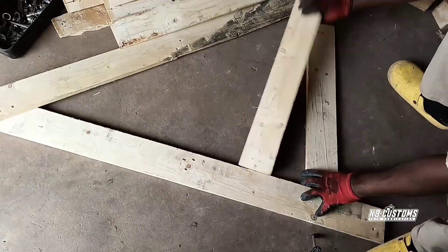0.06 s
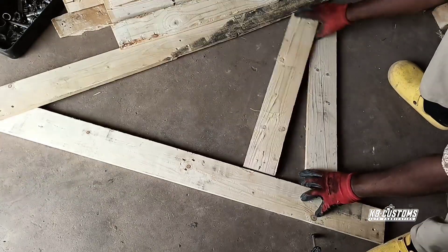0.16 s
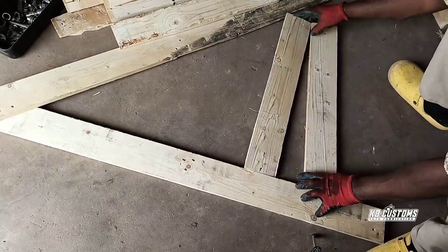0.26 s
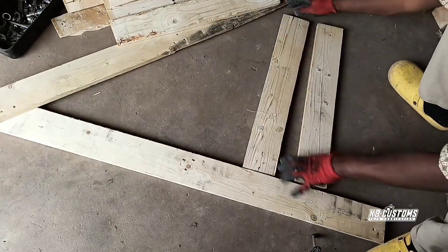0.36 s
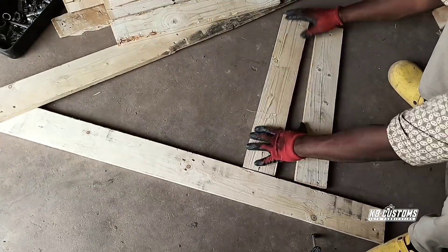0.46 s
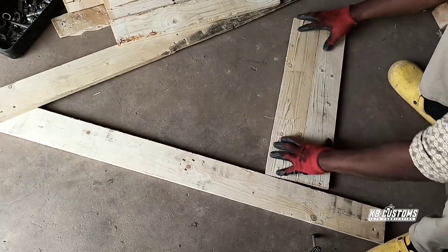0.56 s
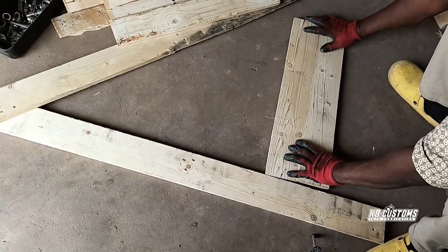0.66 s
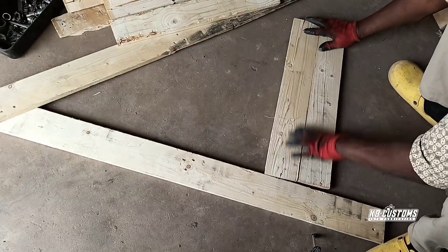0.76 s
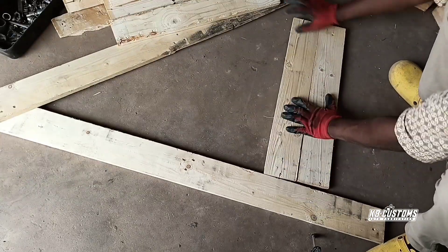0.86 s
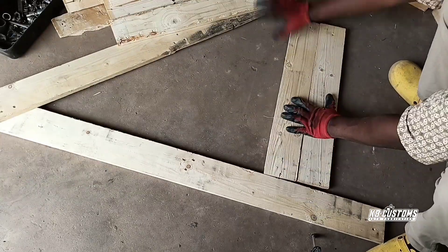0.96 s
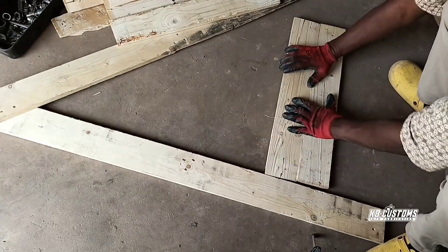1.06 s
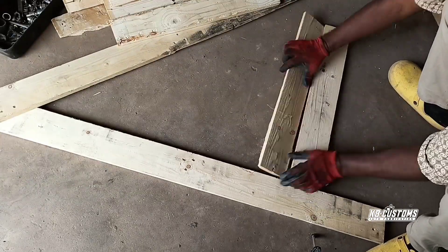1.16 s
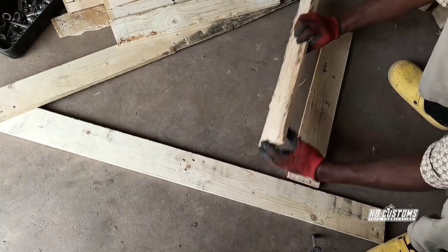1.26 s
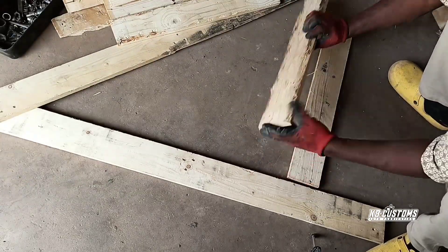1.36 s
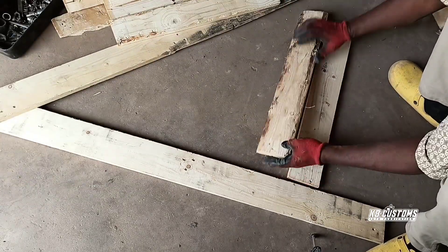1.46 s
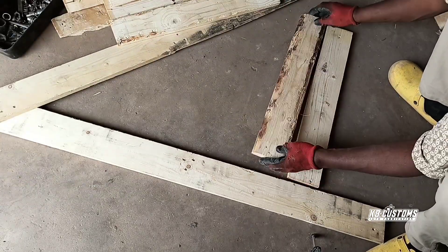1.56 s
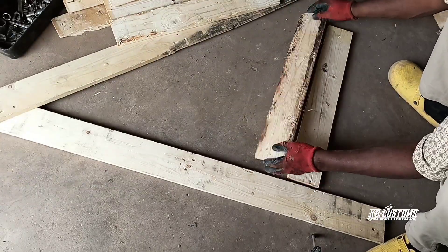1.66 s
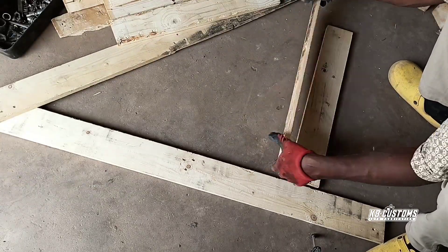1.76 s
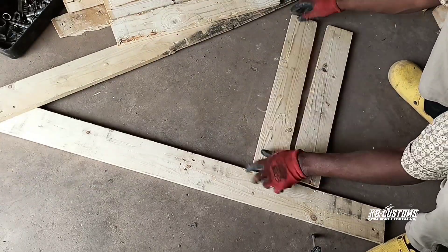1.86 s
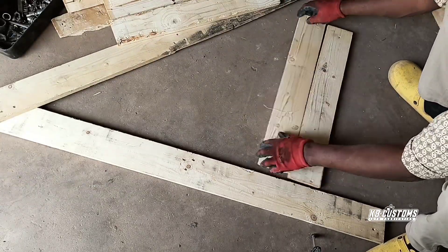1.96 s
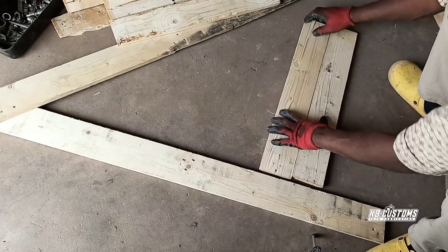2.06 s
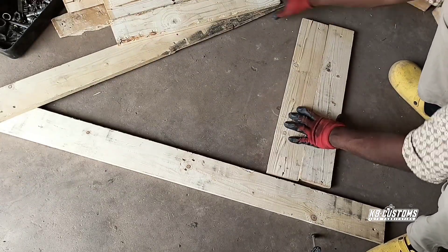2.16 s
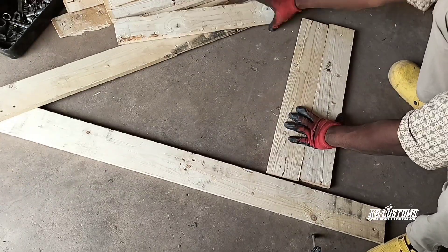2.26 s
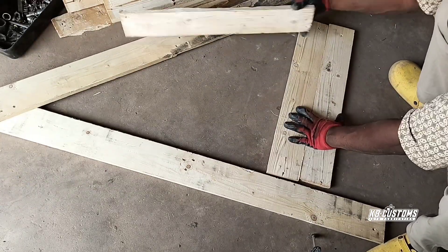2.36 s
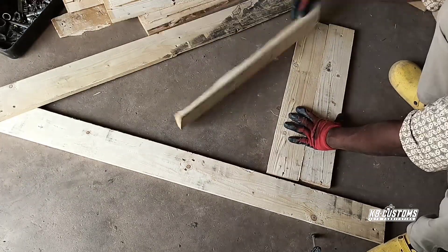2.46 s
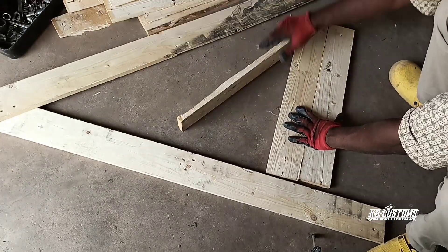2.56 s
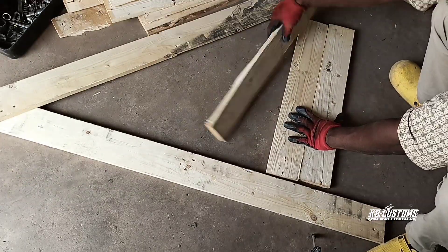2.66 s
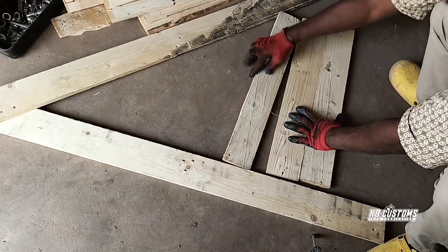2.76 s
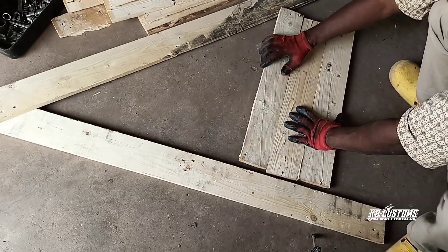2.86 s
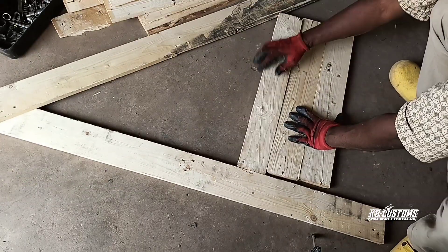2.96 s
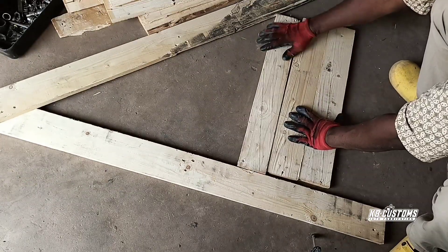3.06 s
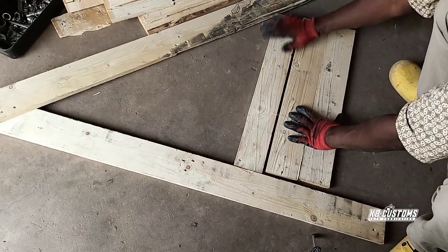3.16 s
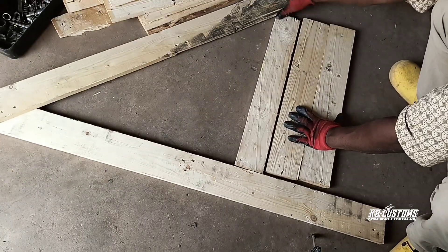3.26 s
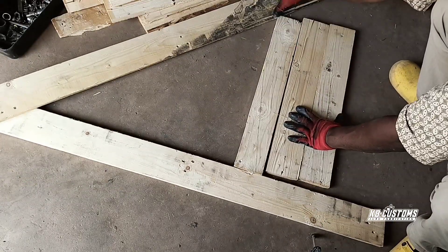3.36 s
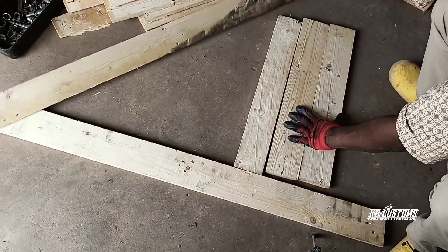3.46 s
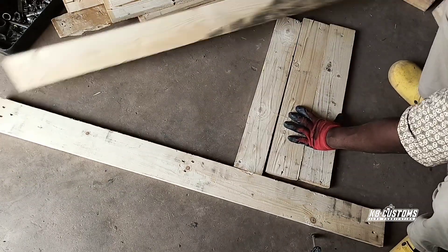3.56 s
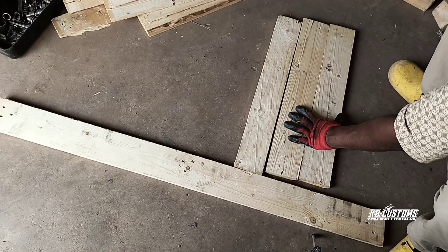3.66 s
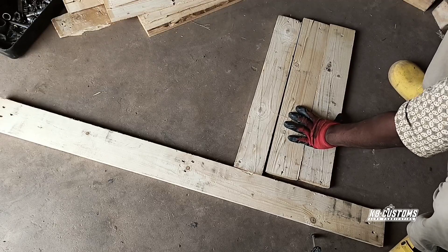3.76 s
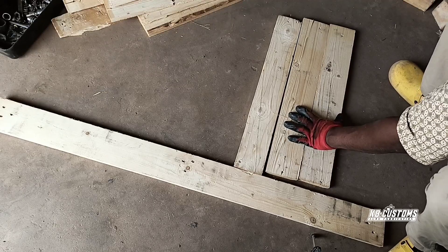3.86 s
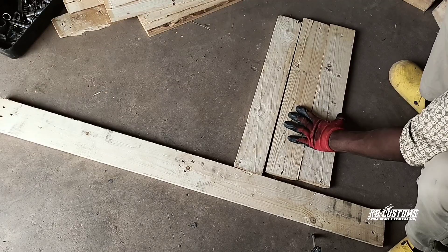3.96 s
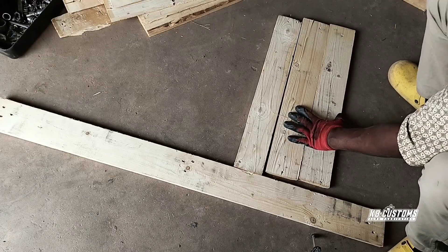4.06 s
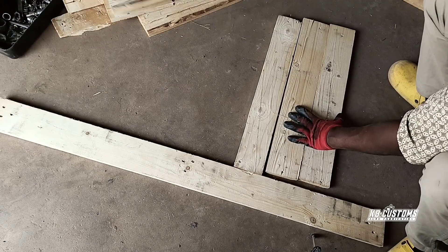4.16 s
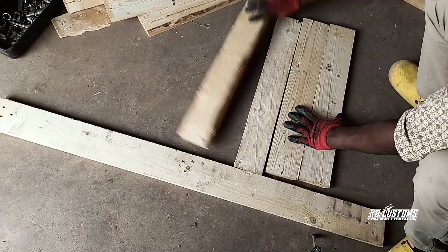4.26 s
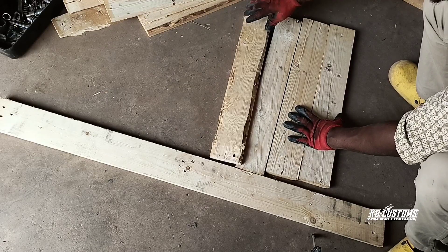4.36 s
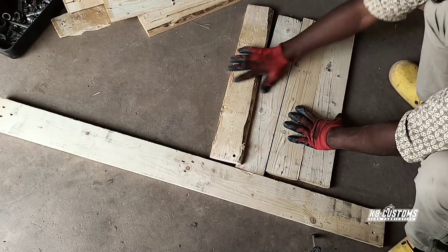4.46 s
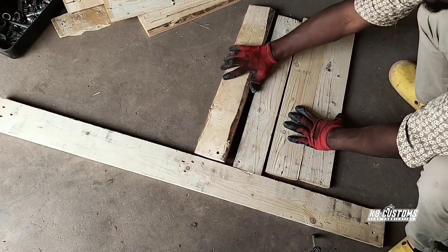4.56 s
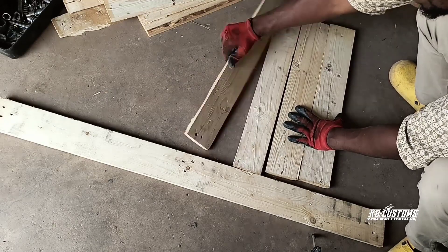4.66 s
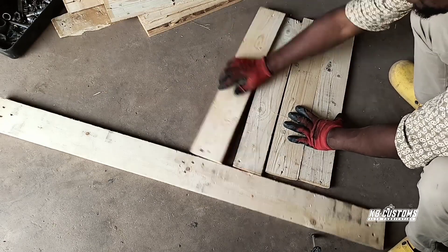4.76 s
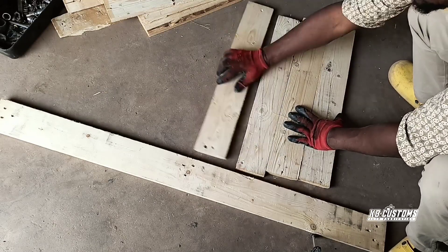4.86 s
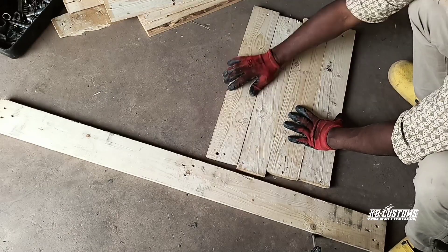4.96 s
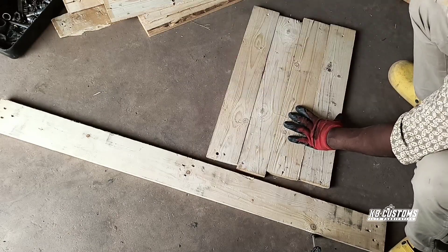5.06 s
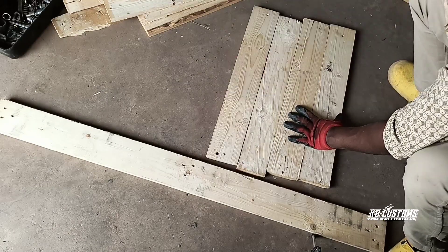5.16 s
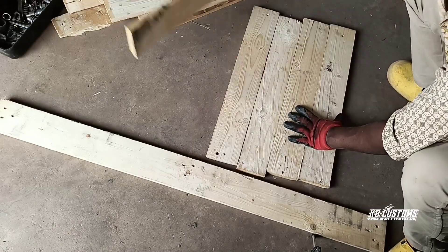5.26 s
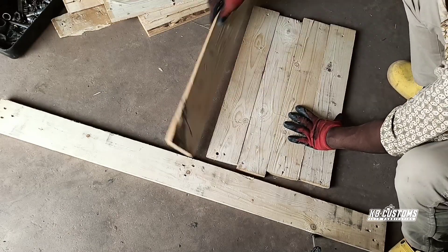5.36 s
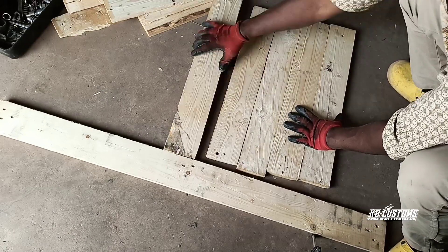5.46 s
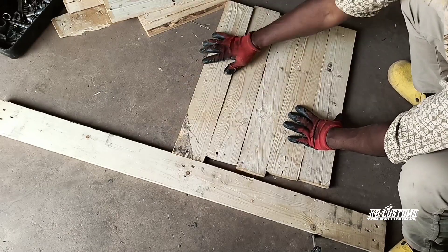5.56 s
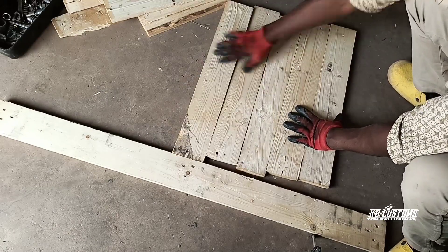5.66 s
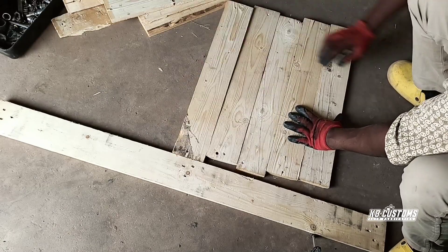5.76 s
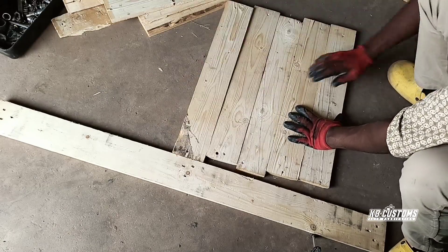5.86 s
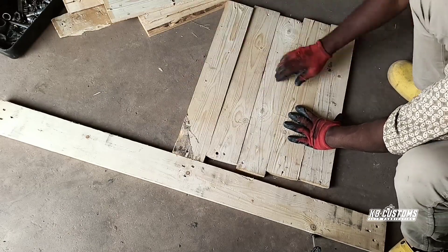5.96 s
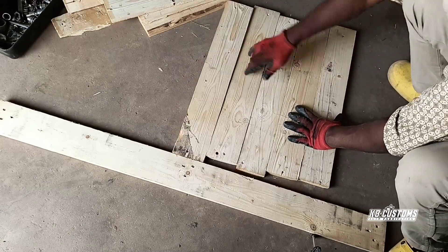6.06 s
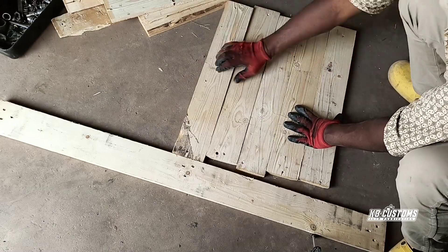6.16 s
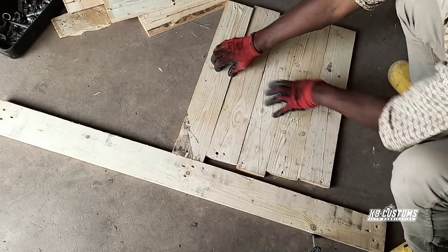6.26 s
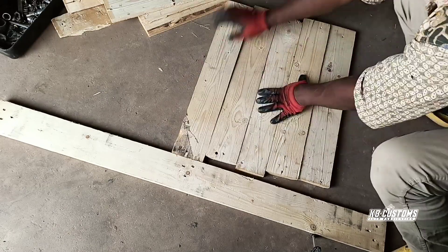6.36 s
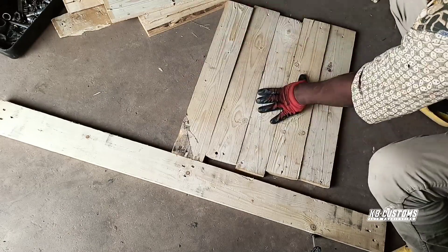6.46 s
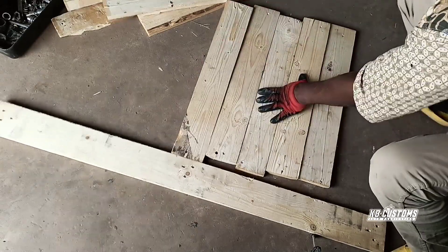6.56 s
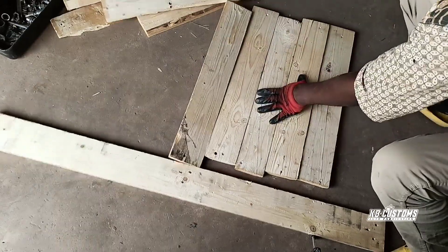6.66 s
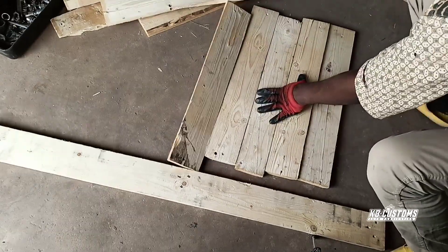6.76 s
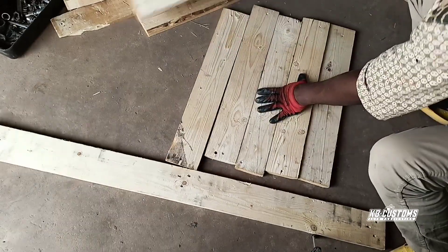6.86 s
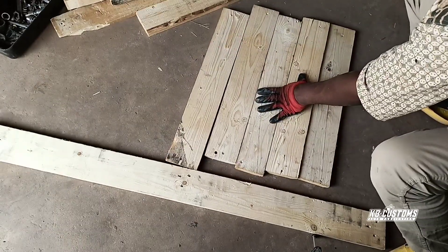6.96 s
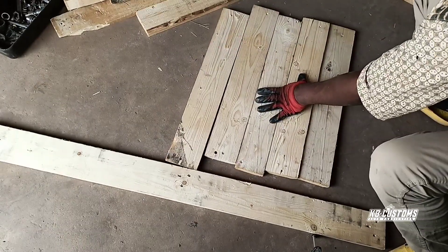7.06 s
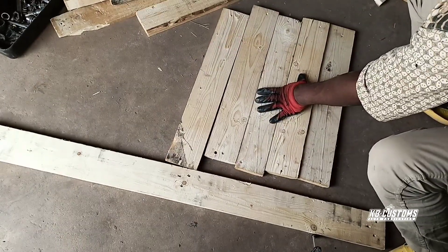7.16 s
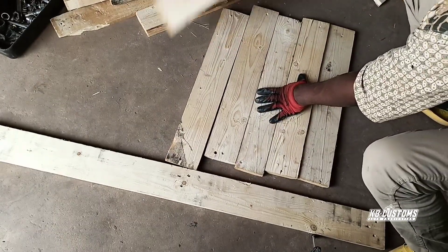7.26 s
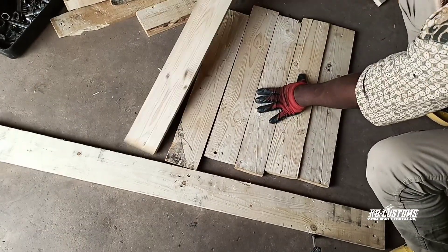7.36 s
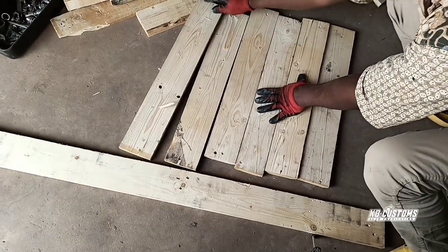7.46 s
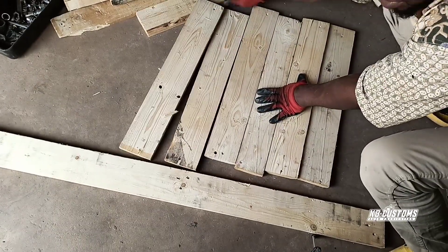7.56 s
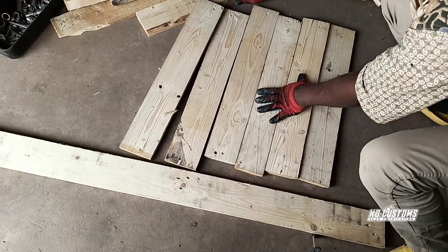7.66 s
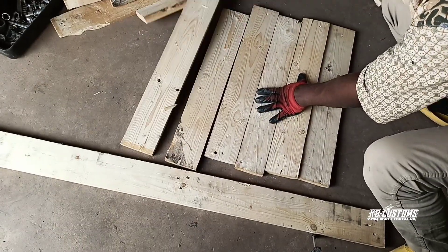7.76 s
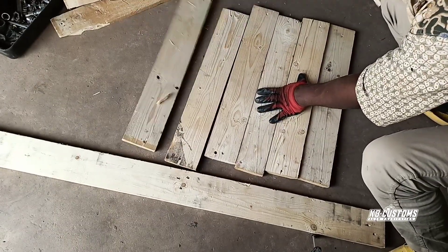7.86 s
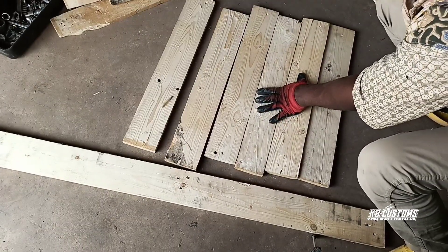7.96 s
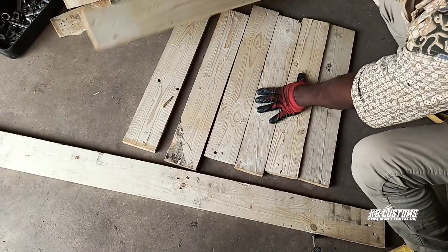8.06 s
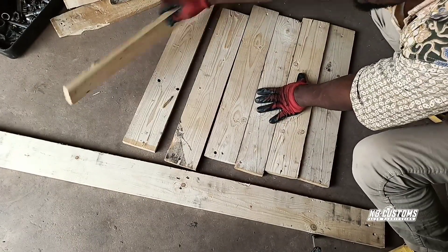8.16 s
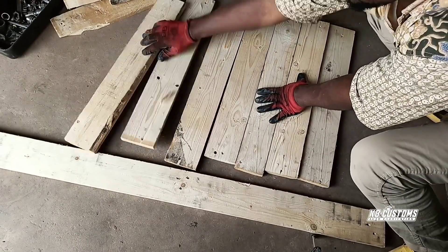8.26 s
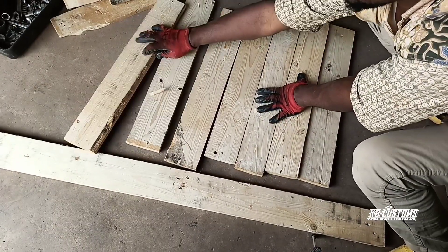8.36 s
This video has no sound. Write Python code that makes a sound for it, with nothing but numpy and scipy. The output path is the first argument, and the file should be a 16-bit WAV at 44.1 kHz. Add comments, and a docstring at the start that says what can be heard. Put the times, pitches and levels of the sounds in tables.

```python
"""Loose pallet boards are laid side by side on a concrete workshop floor, close to the ear.
They knock and clatter as they land: impulsive forces excite bending modes, a crack and a thud.
Pushed by gloved hands they scrape over grit, as random stick and slip; edges tap and gloves brush.
Now and then a dragged board judders, as a wavering sine on one mode. Dull bumps are filtered noise.
Faint reflections follow each contact, and very quiet room air lies beneath."""
import sys
import numpy as np
from scipy import signal
from scipy.fft import rfft, irfft
from scipy.io import wavfile

SR = 44100
rng = np.random.default_rng(int(sys.argv[2]) if len(sys.argv) > 2 else 0)


def file_out(sig):
    """Save sig as 16-bit WAV at sys.argv[1]."""
    # one column per channel
    cols = np.atleast_2d(sig).T
    # limit, then scale
    lim = np.clip(cols, -1, 1)
    pcm = np.round(lim * 32767).astype(np.int16)
    wavfile.write(sys.argv[1], SR, pcm)


N = 371322


def undb(db):
    """Logarithmic level: convert decibels to amplitude gain."""
    return 10 ** (np.asarray(db) / 20)


def unit(x):
    """Normalisation: scale to rms 1."""
    return x / np.sqrt(np.mean(x ** 2))


def colour(x, points, size=1024):
    """Minimum phase: the folded cepstrum of the log gain through (f/Hz, level/dB) gives a causal filter."""
    hz, db = np.transpose(points)
    grid = np.maximum(np.arange(size // 2 + 1) * SR / size, 1)
    log_gain = np.log(undb(np.interp(np.log(grid), np.log(hz), db)))
    cepstrum = irfft(log_gain)
    cepstrum[1:size // 2] *= 2
    cepstrum[size // 2 + 1:] = 0
    response = irfft(np.exp(rfft(cepstrum)))
    return signal.fftconvolve(x, response)[:len(x)]


def resonate(x, hz, width):
    """Simple resonance: a two-pole band-pass with gain 1 at the centre."""
    b, a = signal.iirpeak(hz, hz / min(width, SR / 4), SR)
    return signal.lfilter(b, a, x)


def add(out, s, x):
    """Superposition: mix x into out, starting at time s."""
    i = int(s * SR)
    a, b = max(i, 0), min(i + len(x), N)
    if b > a:
        out[a:b] += x[a - i:b - i]


def at_level(x, envelope, db):
    """Energy equivalence: give x the energy of this envelope with its top at db."""
    return x * undb(db) * np.sqrt(np.sum(envelope ** 2) / np.sum(x ** 2))


# spectrum of the room air: f/Hz, level/dB (relative)
AIR = [(25, -15), (60, -5), (130, 2), (400, -3.5), (900, -10.5), (2500, -14.5), (9000, -15), (12000, -27.5)]
# gain on the air's treble: t/s, level/dB
HISS_LEVEL = [(0, 12.5), (1.5, 2), (2.2, -2), (8.401, -5)]
AIR_DB, HISS_HZ = -77.5, 2500  # rms level before the treble gain; crossover


def air():
    """Broadband noise: very quiet room air, whose hiss sinks away as the work goes on."""
    noise = undb(AIR_DB) * unit(colour(rng.standard_normal(N), AIR))
    low = signal.sosfilt(signal.butter(2, HISS_HZ, "low", fs=SR, output="sos"), noise)
    high = signal.sosfilt(signal.butter(2, HISS_HZ, "high", fs=SR, output="sos"), noise)
    hiss_db = np.interp(np.arange(N) / SR, *np.transpose(HISS_LEVEL))
    # opposite signs keep the two bands in phase at the crossover
    return low - high * undb(hiss_db)


# a dragged board judders on one mode: t/s (peak), f/Hz, level/dB
JUDDERS = [(.005, 706, -34), (1.034, 791, -33.5), (1.687, 307, -36), (1.747, 1433, -25), (2.567, 2017, -36),
           (2.64, 854, -20.5), (2.639, 382, -29.5), (3.729, 178, -31.5), (6.711, 1598, -26.5),
           (6.939, 863, -19.5), (7.0, 332.3, -34), (7.32, 1628, -19), (7.724, 1546, -18),
           (7.797, 1536, -20.5)]
JUDDER_HALF_S = 0.015  # from the peak to 1/e


def judders(waver=0.021, rough=0.05):
    """Stick-slip oscillation: friction locks onto one mode, slightly unsteady in pitch and strength."""
    out, t = np.zeros(N), np.arange(-SR // 10, SR // 10) / SR
    swell = np.exp(-(abs(t) / JUDDER_HALF_S) ** 2.2)
    for s, hz, db in JUDDERS:
        drift = unit(resonate(rng.standard_normal(len(t)), 44, 110))
        grip = unit(resonate(rng.standard_normal(len(t)), 44, 110))
        phase = 2 * np.pi * np.cumsum(hz * (1 + waver * drift)) / SR
        tone = np.sqrt(2) * np.sin(phase)
        add(out, s + t[0], undb(db) * swell * (1 + rough * grip) * tone)
    return out


def slips(n, rate, spread_db):
    """Random impulses: tiny slips, rate per second; a positive spread makes a few much stronger."""
    sizes = undb(spread_db * np.minimum(rng.exponential(size=n), 4))
    happens = rng.random(n) < rate / SR
    return unit(rng.standard_normal(n) * sizes * happens)


def grain(x, ring_s, direct):
    """Modal overlap: a contact excites a thicket of short modes, heard as decaying noise."""
    t = np.arange(SR // 50) / SR
    response = unit(rng.standard_normal(len(t)) * np.exp(-t / ring_s)) / np.sqrt(len(t))
    response[0] += direct
    return signal.fftconvolve(x, response)[:len(x)]


def catches(n, rate_hz, depth_db):
    """Friction modulation: gain of a surface that catches and lets go at an uneven pace."""
    return undb(depth_db * unit(resonate(rng.standard_normal(n), rate_hz, rate_hz)))


# nominal bending and twisting modes of a board: f/Hz, width/Hz, level/dB (relative)
BOARD = [(725, 21, -6), (792.4, 12, 6), (875, 82, -1), (1052, 50, -4), (1240, 79, -6), (1390, 110, -7),
         (1539.6, 38, -2), (1693, 160, -11.5), (2126, 24, -6.5), (2479, 15, -6), (3430, 310, -14),
         (3840, 59, -6)]
# spectrum of the wood: f/Hz, level/dB (relative)
WOOD = [(150, -34.5), (330, -12.5), (520, 7), (750, -1.5), (1600, -4), (2600, 2), (3600, -2.5),
        (6000, -21.5), (12000, -46)]


def board(force, centre_hz, mode_db=11, breadth=0.55):
    """Modal superposition: board and grip shift the modes, and the contact sets the brightness."""
    shifts = np.exp(.02 * rng.standard_normal(len(BOARD)))
    weights_db = 2.5 * rng.standard_normal(len(BOARD))
    modes = np.zeros(len(force))
    for (hz, width, db), shift, weight_db in zip(BOARD, shifts, weights_db):
        modes += undb(db + weight_db) * resonate(force, hz * shift, width)
    wood = colour(force + undb(mode_db) * modes, WOOD)
    return resonate(wood, centre_hz, breadth * centre_hz)


# the duller the contact, the more weight is on the floor
MIDDLE_HZ, THUD_DB_PER_OCTAVE = 1230, -13.5


def thud_of(tone_hz):
    """Contact stiffness: extra thud in dB of a dull, heavy contact over a middling one."""
    return THUD_DB_PER_OCTAVE * np.log2(tone_hz / MIDDLE_HZ)


# spectrum of crunching grit: f/Hz, level/dB (relative)
GRIT = [(900, -27), (2500, -1), (3800, 5), (6500, 5), (7800, -2.5), (9200, -1.5), (11000, -12.5),
        (13500, -21.5), (14700, -9.5), (16000, -14.5)]
# spectrum of weight thudding on the floor: f/Hz, level/dB (relative)
THUD = [(25, -32), (60, -21), (110, -8), (170, -3), (240, -5.5), (320, 7), (430, 4.5), (800, -11.5),
        (3000, -67)]
SCRAPE_THUD_DB = -14  # relative to the wood at MIDDLE_HZ
GRIT_KNEE_HZ = 6000  # above it the grit tilts by top_db per octave
CATCH_STEEPNESS, RELEASE_STEEPNESS = 2.3, 2  # exponents of the swell and the fade


def stroke(s, rise, fall, wood_db, grit_db, centre_hz, top_db):
    """Sliding friction: wood sticks and slips, grit crunches under it, its weight thuds on the floor."""
    t = np.arange(-SR // 8, SR // 5) / SR
    span = np.maximum(np.where(t < 0, rise, fall), .003)
    steepness = np.where(t < 0, CATCH_STEEPNESS, RELEASE_STEEPNESS)
    speed = np.exp(-(abs(t) / span) ** steepness)
    pressure = speed * catches(len(t), rate_hz=25, depth_db=2.18)
    rumble = grain(rng.standard_normal(len(t)), ring_s=0.0065, direct=0.37)
    thud = speed * colour(rumble, THUD)
    friction = grain(slips(len(t), rate=1300, spread_db=2.5), ring_s=0.0048, direct=0.73)
    wood = pressure * board(friction, centre_hz)
    crushing = catches(len(t), rate_hz=59, depth_db=1.0) * slips(len(t), rate=12000, spread_db=0.0)
    crunch = grain(crushing, ring_s=0.0081, direct=0.45)
    # a few coarse grains crack one by one
    ticks = undb(-5.5) * slips(len(t), rate=400, spread_db=3.5)
    spectrum = [(hz, db + top_db * max(np.log2(hz / GRIT_KNEE_HZ), 0)) for hz, db in GRIT]
    grit = colour(pressure * (unit(crunch) + ticks), spectrum)
    thud_db = wood_db + SCRAPE_THUD_DB + thud_of(centre_hz)
    mix = at_level(thud, speed, thud_db)
    mix += at_level(wood, speed, wood_db)
    mix += at_level(grit, speed, grit_db)
    return s + t[0], mix


# a board is pushed over the floor:
# t/s (top speed), length/s, wood level/dB, grit level/dB, f/Hz (centre of the wood tone)
SCRAPES = [(.01, .03, -39.5, -41.5, 850), (0.236, 0.041, -24.5, -28, 1310),
           (0.407, 0.062, -32, -30.5, 1890), (1.032, 0.03, -29.5, -35.5, 1030),
           (1.077, 0.033, -40.5, -35.5, 1230), (1.742, 0.06, -21.5, -36, 1902),
           (1.826, 0.023, -27.5, -25, 2754), (1.867, 0.031, -32.5, -34.5, 1470),
           (1.962, 0.068, -33.5, -42, 1640), (2.128, 0.043, -33.5, -29, 1390),
           (2.56, 0.062, -43.5, -30, 2040), (2.635, 0.051, -24.5, -31, 1110),
           (2.749, 0.03, -23.5, -33.5, 1280), (2.816, 0.041, -38, -46, 1110),
           (2.924, 0.033, -27.5, -31.5, 1210), (3.009, 0.038, -36, -47, 1000),
           (3.207, 0.038, -40.5, -39.5, 2200), (3.322, 0.052, -37, -35.5, 1240),
           (3.531, 0.035, -31.5, -32.5, 1140), (3.604, 0.035, -46.5, -47.5, 1630),
           (3.719, 0.04, -21, -22, 1120), (3.791, 0.12, -31.5, -39.5, 930),
           (3.844, 0.022, -25.5, -33.5, 1070), (3.962, 0.048, -39, -38, 1900),
           (4.52, 0.046, -47.5, -42.5, 1600), (4.583, 0.054, -33.5, -35, 1440),
           (4.719, 0.073, -33, -31.5, 1540), (5.048, 0.04, -36.5, -44.5, 920),
           (5.097, 0.023, -44.5, -37, 2180), (6.193, 0.04, -39.5, -42.5, 1270),
           (6.449, 0.052, -33.5, -35.5, 1060), (6.567, 0.073, -38, -35, 2040),
           (6.707, 0.045, -25, -44.5, 1940), (6.77, 0.038, -39.5, -41.5, 710),
           (6.881, 0.017, -19.5, -39, 1047), (6.936, 0.053, -19.5, -45, 1130),
           (6.998, 0.057, -30, -61, 885), (7.247, 0.039, -34.5, -42.5, 1270), (7.31, 0.06, -21, -41, 1605),
           (7.644, 0.052, -31, -35.5, 1270), (8.131, 0.012, -24.5, -49, 1680),
           (8.327, 0.026, -38, -43.5, 1270), (8.386, 0.057, -37, -47, 940)]
SCRAPE_RISE_SHARE = 0.48
SCRAPE_TOP_DB = 3.5  # per octave: pressed grit is crushed and sizzles


def scrapes():
    """Sliding friction: pushes swell and fade almost evenly."""
    out = np.zeros(N)
    for s, length, wood_db, grit_db, centre_hz in SCRAPES:
        rise = SCRAPE_RISE_SHARE * length
        add(out, *stroke(s, rise, length - rise, wood_db, grit_db, centre_hz, SCRAPE_TOP_DB))
    return out


# dull bumps of shifting weight: t/s (peak), level/dB
BUMPS = [(0.014, -47), (0.256, -51.5), (3.567, -43), (4.556, -35.5), (4.701, -45.5), (4.846, -55.5),
         (8.41, -45.5), (6.452, -50)]
# spectrum of a bump: f/Hz, level/dB (relative)
BUMP = [(25, -10), (50, -4), (85, 10.5), (150, 3), (230, -16.5), (600, -53)]
BUMP_HALF_S = .03  # from the peak to 1/e


def bumps():
    """Contact duration: soft, heavy contacts carry mostly bass."""
    out, t = np.zeros(N), np.arange(-SR // 5, SR // 5) / SR
    weight = np.exp(-(t / BUMP_HALF_S) ** 2)
    for s, db in BUMPS:
        bass = colour(rng.standard_normal(len(t)), BUMP, size=4096)
        add(out, s + t[0], at_level(weight * bass, weight, db))
    return out


TOUCH_TOP_DB = 0.5  # grit tilt per octave for brushes and taps
# gloves brush over the wood: t/s (peak), level/dB (hiss)
BRUSHES = [(.065, -56.5), (0.659, -43), (0.971, -47.5), (2.285, -66.5), (3.418, -64.5), (4.051, -65),
           (4.393, -49.5), (3.123, -71.5), (5.168, -60.5), (5.572, -45.5), (5.699, -56.5), (6.118, -46.5),
           (6.35, -61.5), (7.577, -48.5)]
BRUSH_RISE_S, BRUSH_FALL_S = 0.019, 0.026
BRUSH_WOOD_DB, BRUSH_HZ = -5, 2040  # wood relative to the hiss; centre of the wood tone


def brushes():
    """Light friction: gloves are mostly hiss, with less wood."""
    out = np.zeros(N)
    for s, db in BRUSHES:
        wood_db = db + BRUSH_WOOD_DB
        add(out, *stroke(s, BRUSH_RISE_S, BRUSH_FALL_S, wood_db, db, BRUSH_HZ, TOUCH_TOP_DB))
    return out


# a board lands or hits its neighbour: t/s, wood level/dB, crack level/dB,
# f/Hz (centre of the wood tone), f/Hz (ringing mode), length/s (fall of the rattle)
KNOCKS = [(0.705, -15.5, -33.5, 1560, 1056, 0.015), (1.819, -14.5, -20.5, 3100, 2420, .012),
          (2.117, -20, -26.5, 1600, 1297, 0.029), (2.357, -10, -27.5, 1676, 2340, 0.034),
          (2.405, -18, -35.5, 1180, 1426, 0.023), (3.797, -19.5, -27, 1280, 1460, 0.0064),
          (4.147, -20, -33.5, 1020, 1596, 0.046), (4.182, -11, -41, 1170, 1524, 0.037),
          (4.235, -18, -55, 928, 822, 0.008), (4.373, -26.5, -34.5, 2270, 2490, 0.011),
          (4.615, -12, -31, 1170, 1457, 0.067), (4.769, -12, -30, 1375, 1167, 0.016),
          (5.257, -23, -33, 1940, 2220, 0.015), (5.271, -15, -30, 1360, 1610, 0.028),
          (5.375, -11.5, -30, 1220, 1166, 0.03), (5.419, -15.5, -39, 1234, 793, 0.01),
          (6.884, -12.5, -29.5, 974, 830, 0.044), (7.674, -25, -24.5, 1820, 2030, 0.067),
          (7.714, -14, -37, 1340, 1530, 0.054), (7.767, -12, -31, 1800, 1507, 0.027),
          (7.777, -21.5, -43, 1660, 1580, 0.029), (8.137, -7.5, -18, 1960, 830, 0.022),
          (8.182, -15.5, -30.5, 1590, 1496, 0.027), (8.369, -18.5, -59, 1000, 760, .035)]
KNOCK_THUD_DB = -27.5  # relative to the wood at MIDDLE_HZ
# a hard, flat blow stops dead; a glancing one chatters on
HARD_BLOW_DB, HARD_T60_S, DB_PER_DOUBLED_T60 = -7, .034, 14
RATTLE_DELAY_S, RATTLE_RISE_S = .011, 0.011
RATTLE_DB, RATTLE_GRIT_DB = -9.5, -12  # relative to the blow and to its crack
RATTLE_TOP_DB = -3  # grit tilt per octave


def knocks(blow=11, contact_s=0.00121, ring_db=-6, ring_width_hz=45, settle_s=0.061):
    """Impact excitation: a hard blow in dying chatter, then a rattle to rest; the ringing is cut short after
    about 60 ms."""
    out, t = np.zeros(N), np.arange(SR // 5) / SR
    damping = np.exp(-(t / settle_s) ** 4)
    for s, wood_db, crack_db, centre_hz, mode_hz, rattle_s in KNOCKS:
        t60 = HARD_T60_S * 2 ** ((HARD_BLOW_DB - wood_db) / DB_PER_DOUBLED_T60)
        decay = np.exp(-np.log(1000) * t / t60)
        force = decay * slips(len(t), rate=4000, spread_db=-0.5)
        force[int(contact_s * SR)] += blow
        contact = grain(force, ring_s=0.0029, direct=0.7)
        wood = at_level(board(contact, centre_hz), decay, wood_db)
        ring = at_level(resonate(force * decay, mode_hz, ring_width_hz), decay, wood_db + ring_db)
        splinters = grain(decay * slips(len(t), rate=5400, spread_db=0.0), ring_s=0.0035, direct=2.2)
        crack = at_level(resonate(colour(splinters, GRIT), 5600, 5300), decay, crack_db)
        thud_db = wood_db + KNOCK_THUD_DB + thud_of(centre_hz)
        thud = at_level(colour(force, THUD), decay, thud_db)
        add(out, s, damping * (wood + ring + crack + thud))
        rattle = stroke(s + RATTLE_DELAY_S, RATTLE_RISE_S, rattle_s, wood_db + RATTLE_DB,
                        crack_db + RATTLE_GRIT_DB, centre_hz, RATTLE_TOP_DB)
        add(out, *rattle)
    return out


# an edge is set down softly: t/s (peak), level/dB (wood), f/Hz (centre of the wood tone)
TAPS = [(0.899, -48, 1950), (1.145, -50.5, 1290), (1.287, -50, 2460), (1.639, -58, 1230),
        (1.684, -39, 1300), (2.191, -31, 960), (3.044, -41, 1000), (2.867, -58.5, 545), (3.88, -35.5, 1050),
        (3.993, -44, 584), (5.473, -41.5, 564), (5.84, -58.5, 523), (5.93, -46.5, 730), (6.029, -29, 1265),
        (7.043, -37.5, 1300)]
TAP_RISE_S, TAP_FALL_S = 0.0064, 0.017
TAP_GRIT_DB, TAP_GRIT_DB_PER_OCTAVE = -14.5, 7  # relative to the wood at MIDDLE_HZ, and its slope


def taps():
    """Soft contact: taps start quickly, and brighter ones carry more grit."""
    out = np.zeros(N)
    for s, db, centre_hz in TAPS:
        grit_db = db + TAP_GRIT_DB + TAP_GRIT_DB_PER_OCTAVE * np.log2(centre_hz / MIDDLE_HZ)
        add(out, *stroke(s, TAP_RISE_S, TAP_FALL_S, db, grit_db, centre_hz, TOUCH_TOP_DB))
    return out


def workshop(x, wet_db=-25, t60=0.067, delay_s=0.0074):
    """Reverberation: faint, short, dull reflections from the floor and stacked timber."""
    t = np.arange(SR // 3) / SR
    diffuse = resonate(rng.standard_normal(len(t)), 1600, 2000)
    tail = diffuse * np.exp(-np.log(1000) * t / t60) * (t > delay_s)
    tail /= np.sqrt(np.sum(tail ** 2))
    return x + undb(wet_db) * signal.fftconvolve(x, tail)[:N]


def scene():
    """Superposition: boards in the room over very quiet air."""
    contacts = judders() + scrapes() + bumps() + brushes() + knocks() + taps()
    return (workshop(contacts) + air())[None]


TOP_HZ = 15750


def record(dry):
    """Saturation and band limiting: tanh rounds the highest peaks, a steep low-pass cuts the top."""
    low_pass = signal.ellip(8, .2, 80, TOP_HZ, fs=SR, output="sos")
    return signal.sosfilt(low_pass, np.tanh(dry))


dry = scene()
out = record(dry)
file_out(out)
```